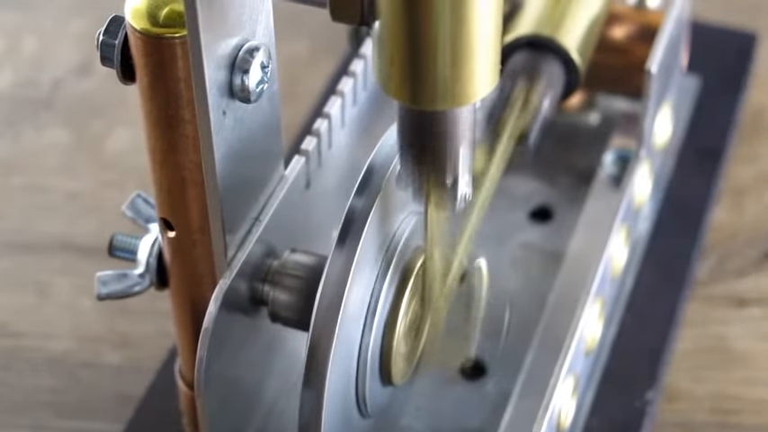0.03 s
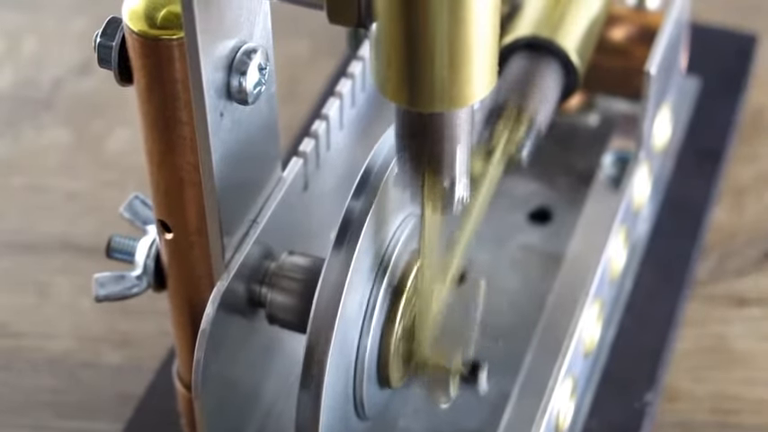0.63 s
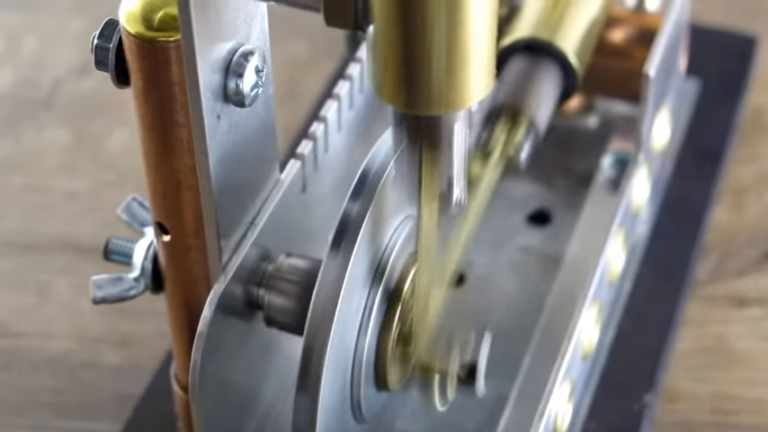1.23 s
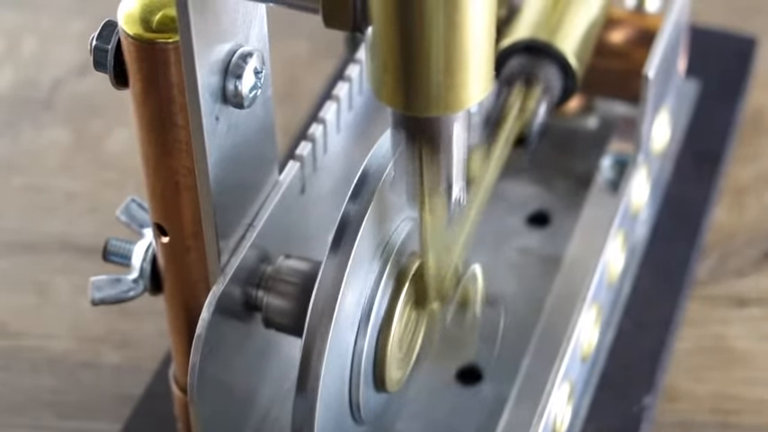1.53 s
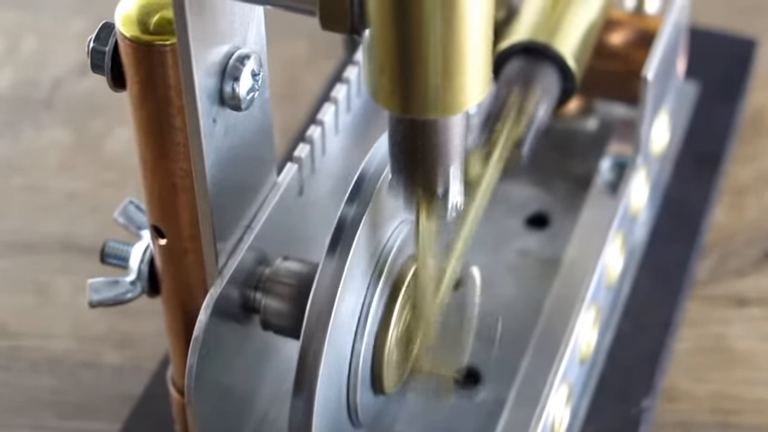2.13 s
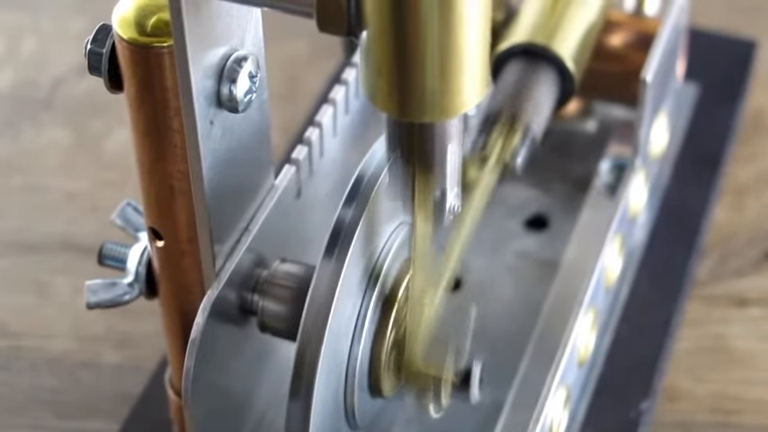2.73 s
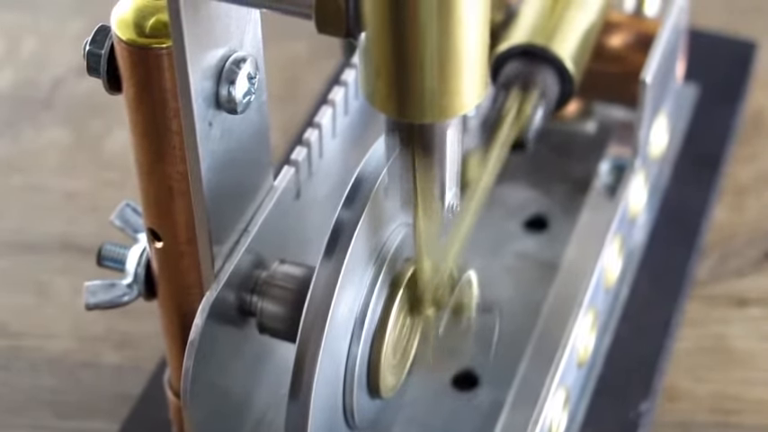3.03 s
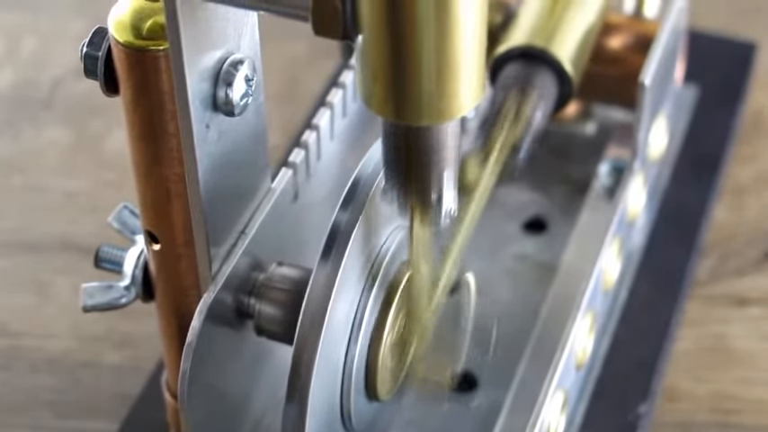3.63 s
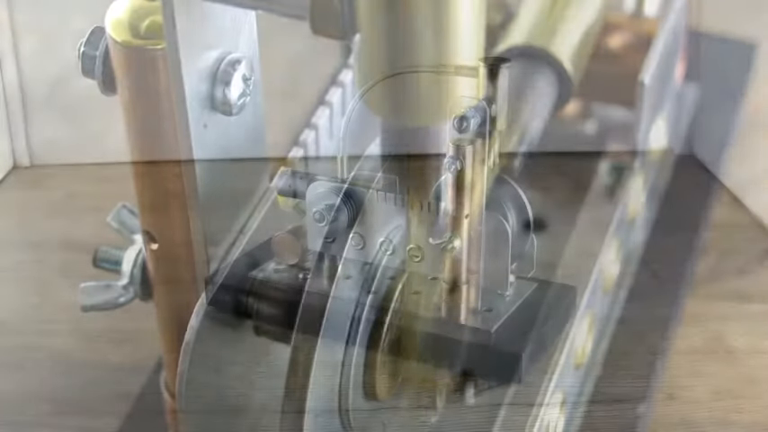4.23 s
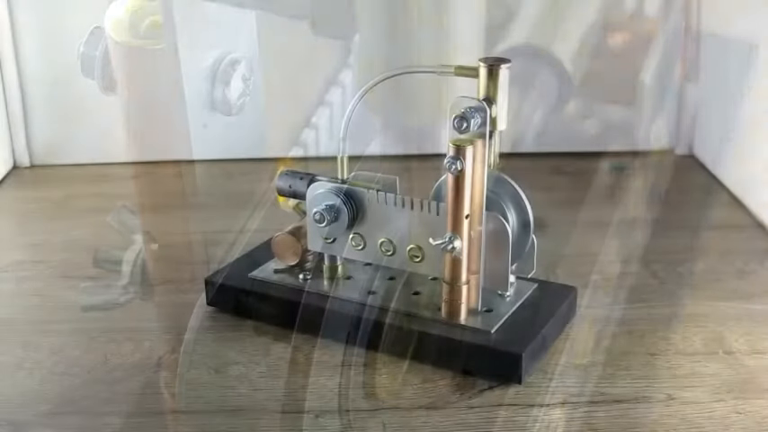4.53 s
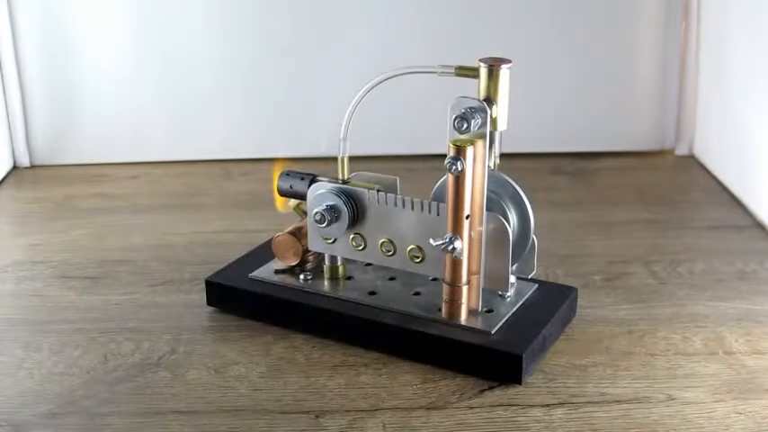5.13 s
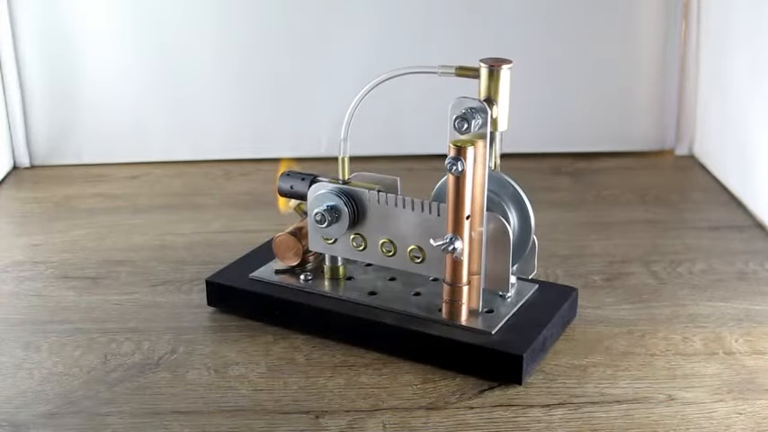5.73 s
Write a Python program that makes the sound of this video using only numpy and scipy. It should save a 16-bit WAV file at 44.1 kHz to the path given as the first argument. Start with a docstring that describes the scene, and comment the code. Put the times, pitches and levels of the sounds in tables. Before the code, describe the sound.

Rapid, steady metallic knocking and whirring from a little engine close by, then, after a short silence, from a step away.

```python
"""A small hot air engine runs at about 25 turns a second on a wooden table, heard first from close by.
Three times a turn the play in its linkage knocks against the metal frame; the hardest knocks make a
rod ring, and the swinging masses make the base hum. It pushes harder for two seconds, then eases.
At 4.7 s a short silence falls, and then the engine is heard from a step away, its knocks softer."""
import sys
import numpy as np
from scipy.fft import rfft, irfft, next_fast_len
from scipy.io import wavfile
from scipy.ndimage import uniform_filter1d

SR = 44100
rng = np.random.default_rng(int(sys.argv[2]) if len(sys.argv) > 2 else 0)


def master(y):
    """Save y as 16-bit WAV."""
    cut = np.clip(np.atleast_2d(y).T, -1, 1)
    pcm = np.round(cut * 32767)  # scale
    wavfile.write(sys.argv[1], SR, pcm.astype(np.int16))


N = 260190


def engine_close():
    """Right above the crank the knocks are sharp and the rod rings loudly."""
    # crank position: (time [s], turns completed)
    crank = [(-.0437, -2), (2.0059, 50), (4.7273, 119)]
    # how hard the engine pushes: (time [s], effort [dB])
    effort = [(0, -1.8), (1.2, 0.1), (1.72, 0), (2.13, 2), (2.26, -3), (2.85, 0), (3.05, -2.5), (3.3, -1.8),
              (4.67, -1.3)]
    # the knocks of one turn, levels relative: (crank angle [turns], level [dB], base rise [s],
    # base t60 [s], first contact [dB], scrape before it [dB], rod ring [dB], scatter [dB])
    knocks = [(0, 1.5, 0.0014, 0.054, -2.5, -16, 0, 0.8), (.385, -7, 0.0023, 0.099, -2, 2, -6.6, 3),
              (0.701, -9, 0.00024, 0.057, 0, -40.5, -37.5, 1)]
    # overall colour of the knocks: (frequency [Hz], relative level [dB])
    slope = [(30, -17), (80, -17), (300, -11), (500, -15.5), (1100, -15), (1500, -9.5), (3300, -16),
             (5500, -0.5), (8200, -1.5), (9100, -12.5), (11500, -18.5), (12900, -24.5), (15400, -28.5)]
    # resonances of the metal frame: (frequency [Hz], width [Hz], boost [dB])
    modes = [(767, 510, 6), (1527, 343, 10.5), (1950, 184, 11), (2512, 367, 14), (2842, 223, 15),
             (3164, 146, 10.5), (3554, 183, 10), (3905, 610, 11.5), (4663, 310, 13.5), (5360, 490, 5),
             (5845, 400, 5.5), (6810, 270, 7), (7230, 320, 5), (10520, 160, 5.5)]
    # hum of base and frame: (multiple of crank speed, relative level [dB])
    orders = [(1, -48), (2, -62.5), (3, -61), (4, -55.6), (5, -52.5), (6, -50.5), (7, -48.5), (8, -55.5),
              (9, -62.5), (10, -51), (11, -61), (12, -44), (13, -65.5), (14, -59.5), (15, -54), (16, -60.5),
              (25, -65.5), (28, -52.5), (32, -60), (33, -58), (35, -56.5), (38, -60), (43, -56.5),
              (55, -52), (61, -51), (62, -42), (66, -46), (69, -46), (78, -53.5), (80, -44.5)]
    # stereo balance: (frequency [Hz], left minus right [dB])
    balance = [(60, -1.5), (99, 1.5), (160, -2.5), (270, -0.5), (450, -3), (740, -0.5), (1220, 1.0),
               (2010, -0.5), (3330, 0.0), (5500, -0.5), (9080, -16), (15000, -2.5)]
    blows = strikes(crank, effort, knocks)
    shake = shaking(blows, quick=1, scrape_db=-10, jitter_s=.00015)
    knocking = clatter(blows, shake, slope, modes, grain=0.19, linger=1.395, quick=1.7,
                       rub=0.47, drift=0.52)
    ringing = rod(blows, ring_hz=4489, detune=0.0048, rise_s=0.0011, free_s=0.012, phase_spread=0.52)
    humming = hum(crank, orders, shake, waver=0.5, pulsing=1.0)
    return microphones(amp(-24) * knocking + amp(-13) * ringing + amp(0.27) * humming, balance)


def engine_wide():
    """From a step away the knocks are softer and the table's hum stands out."""
    # columns and units as in engine_close
    crank = [(4.7662, -2), (5.9521, 28)]  # crank position
    effort = [(4.84, -0.7), (5.9, 0.61)]  # how hard the engine pushes
    knocks = [(-.003, 3.5, 0.0013, 0.05, -3.5, -9, -0.5, 0.76),
              (0.389, -3.5, 0.0017, 0.08, -5, -0.5, -8, 1.1),
              (0.701, -2.5, 0.00045, .046, -3, -16, -22, 1.1)]  # the knocks of one turn
    slope = [(30, -9), (80, -13), (300, -10), (500, -10.5), (1100, -11), (1500, -9), (3300, -12),
             (5500, -1.5), (8200, -2), (9100, -16.5), (11500, -21.0), (12900, -26), (15400, -34)]  # their overall colour
    modes = [(1604, 320, 8.9), (2010, 200, 8.5), (2570, 210, 8.3), (2795, 130, 9.6), (3140, 140, 5.2),
             (3586, 250, 11.3), (3960, 320, 10), (4590, 700, 10.1), (5380, 150, 9.4), (5660, 380, 4.4),
             (6660, 170, 6.9), (7200, 120, 3), (10300, 160, 3.7)]  # frame resonances
    orders = [(1, -53.5), (2, -56.5), (3, -70.5), (4, -66), (5, -52.5), (6, -54.5), (7, -43), (8, -55),
              (9, -54), (10, -50.5), (11, -77), (12, -43.5), (13, -81), (14, -62), (15, -66), (16, -60),
              (20, -60), (28, -61), (33, -81), (34, -59.5), (59, -45.5), (61, -44.5), (62, -43), (67, -55),
              (78, -52), (81, -46)]  # hum of base and frame
    balance = [(60, 0), (110, -0.5), (200, -2), (380, -0.5), (700, -0.5), (1290, -0.5), (2380, -1),
               (4400, 2), (8120, -12.5), (15000, -4)]  # stereo balance
    blows = strikes(crank, effort, knocks)
    shake = shaking(blows, quick=0.97, scrape_db=-0.5, jitter_s=0.00019)
    knocking = clatter(blows, shake, slope, modes, grain=0.27, linger=1.43, quick=1.2,
                       rub=0.72, drift=0.17)
    ringing = rod(blows, ring_hz=4406, detune=0.0042, rise_s=0.0013, free_s=0.012, phase_spread=0.62)
    humming = hum(crank, orders, shake, waver=-0.9, pulsing=1.16)
    return microphones(amp(-27.5) * knocking + amp(-23.5) * ringing + amp(-0.54) * humming, balance)


def strikes(crank, effort, knocks):
    """The linkage knocks at set crank angles; strength follows effort and surges by chance."""
    surge_depth_db, surge_turns = 0.8, 2.7
    effort_response = (1, 1.9, 1)  # dB per dB: the loose return stroke reacts most
    seconds, turns = np.transpose(crank)
    whole = np.arange(turns[0], turns[-1])
    count = np.arange(len(whole))
    surge_db = surge_depth_db * np.interp(count / surge_turns, count, rng.standard_normal(len(whole)))
    blows = []
    for (angle, *knock, scatter_db), response in zip(knocks, effort_response):
        times = np.interp(whole + angle, turns, seconds)
        stroke_db = response * (curve(effort, times) + surge_db)
        sizes = amp(stroke_db + scatter_db * rng.standard_normal(len(times)))
        blows.append((times, sizes, knock))
    return blows


def shaking(blows, quick, scrape_db, jitter_s):
    """Envelope of all knocks: the joint slides, makes first contact, then chatters and settles."""
    lead = SR // 150
    t = np.arange(-lead, SR // 12) / SR
    after = np.maximum(t, 0)
    power = np.zeros(N)
    for times, sizes, (db, rise, t60, contact_db, slide_db, _) in blows:
        slide = amp(slide_db + scrape_db) * np.exp(-(t / 0.0031) ** 2)
        contact = amp(contact_db) * (1 - np.exp(-after / .0009)) * np.exp(-after / 0.0028)
        settle = (1 - np.exp(-after * quick / rise)) * amp(-60 * after * quick / t60)
        shape = np.sqrt(slide ** 2 + contact ** 2 + settle ** 2)
        starts = times - lead / SR + jitter_s * rng.standard_normal(len(times))
        power += place(starts, (amp(db) * sizes[:, None] ** 0.48 * shape) ** 2)
    return np.sqrt(power / np.mean(power[power > 0]))


def clatter(blows, shake, slope, modes, grain, linger, quick, rub, drift):
    """Each knock sounds through the frame: a body that repeats and a chatter that never does."""
    # part of a knock that is alike on every turn: (frequency [Hz], power share [0-1])
    repeat = [(100, 0.2), (380, 0.1), (500, 0.78), (1500, 0.35), (2800, 0.26), (4500, 0.26), (6500, 0),
              (10000, 0.07)]
    # likeness of the chatter left and right: (frequency [Hz], correlation [0-1])
    alike = [(200, 0.93), (1400, 0.76), (3100, 0.62), (5000, 0.25), (7000, 0.48), (14000, 0.43)]
    share = lambda hz: along(repeat, hz)
    spread = lambda hz: np.arccos(along(alike, hz)) / 2
    mid_side = lambda hz: np.array([np.cos(spread(hz)), np.sin(spread(hz))])
    active_rms = np.sqrt(np.mean(shake > 0))
    body = active_rms * knock_body(blows, linger, drift)
    rubbing = active_rms * unit(shake ** rub)
    ticks = shaking(blows, quick, scrape_db=-3.5, jitter_s=.00015)
    grit = chatter(rubbing, shake, ticks, grain)
    mid, side = filtered(grit, lambda hz: np.sqrt(1 - share(hz)) * mid_side(hz))
    mid = mid + filtered(body, lambda hz: np.sqrt(share(hz)))
    return filtered(np.array([mid + side, mid - side]), lambda hz: frame(slope, modes, hz))


def knock_body(blows, linger, drift):
    """The low, repeating part of a knock builds up slowly and rings longer in the frame."""
    t = np.arange(SR // 12) / SR
    body = np.zeros(N)
    for times, sizes, (db, rise, t60, *_) in blows:
        shape = amp(db - 60 * t / (t60 * linger)) * (1 - np.exp(-t / (rise + 0.00084)))
        # the point of contact wanders over a second or so, and the overtones with it
        wander = drift * smooth_noise(len(times), span=24)[:, None]
        train = np.cos(wander) * echoes(shape) + np.sin(wander) * echoes(shape)
        body += place(times, sizes[:, None] ** 0.5 * train)
    return unit(body)


def chatter(rubbing, shake, ticks, grain):
    """Tiny contacts make grit: rubbing joints in the mids, knocks in the treble, brief ticks on top."""
    contacts = np.exp(grain * smooth_noise(N, span=40))

    def grit(envelope, band):
        noise = envelope * contacts * rng.standard_normal((2, N))
        return filtered(noise, lambda hz: np.sqrt(band(hz)))

    above = lambda hz, edge_hz: 1 / (1 + (edge_hz / (hz + 1)) ** 8)
    mids = lambda hz: 1 - above(hz, 3530)
    top = lambda hz: above(hz, 7800)
    treble = lambda hz: (1 - mids(hz)) * (1 - top(hz))
    return grit(rubbing, mids) + grit(shake, treble) + grit(ticks, top)


def echoes(shape):
    """A colourless train of dense reflections that dies away along shape."""
    train = shape * rng.standard_normal(len(shape))
    for _ in range(4):  # flatten the spectrum and restore the envelope in turn
        train = irfft(np.exp(1j * np.angle(rfft(train))), len(shape))
        train *= shape / np.sqrt(np.abs(uniform_filter1d(train ** 2, size=128)) + 1e-12)
    return train


def frame(slope, modes, hz):
    """The metal frame's response, of mean power 1: resonances on a broad slope."""
    peaks_db = sum(db / (1 + (2 * (hz - centre) / width) ** 2) for centre, width, db in modes)
    return causal(unit(amp(along(slope, hz) + peaks_db)))


def rod(blows, ring_hz, detune, rise_s, free_s, phase_spread):
    """A struck rod rings for a few milliseconds, until the bearing takes up its play and damps it."""
    t = np.arange(SR // 50) / SR
    out = np.zeros(N)
    for times, sizes, (*_, ring_db) in blows:
        pitch, length, phase = rng.standard_normal((len(times), 3)).T[:, :, None]
        damped_at = free_s * np.exp(length / 6)
        shape = (1 - np.exp(-t / rise_s)) * np.exp(-(t / damped_at) ** 4 - t / .012)
        tone = np.sin(2 * np.pi * ring_hz * (1 + detune * pitch) * t + phase_spread * phase)
        out += place(times, amp(ring_db) * sizes[:, None] ** 0.79 * shape * tone)
    return out


def hum(crank, orders, shake, waver, pulsing):
    """The swinging masses shake base and frame at whole multiples of the crank speed."""
    t = np.arange(N) / SR
    angle = 2 * np.pi * curve(crank, t)
    knots = np.arange(0, N / SR + 1, 1 / 10)
    # tones above the 50th order belong to the frame and swell with every knock
    swell = np.abs(uniform_filter1d(shake, size=128)) ** pulsing
    out = np.zeros(N)
    for order, db in orders:
        waver_db = waver * np.sqrt(order / 10) * rng.standard_normal(len(knots))
        level = np.interp(t, knots, amp(db + waver_db))
        tone = np.sqrt(2) * level * np.sin(order * angle + 2 * np.pi * rng.random())
        out += tone * swell if order > 50 else tone
    return out


def microphones(x, balance):
    """The engine stands to the right: the left side gets less top end, and gets it later."""
    # phase between the sides: (frequency [Hz], lead of the left [rad])
    left_lead = [(100, 0), (1500, -.1), (3400, -0.1), (4100, -1.6), (4500, -0.51), (5600, -1.42),
                 (6500, -2.04), (8500, -1.17), (14000, -0.48)]

    def pair(hz):
        ratio = amp(along(balance, hz))
        lead = np.exp(.5j * along(left_lead, hz))
        return np.array([ratio * lead, 1 / lead]) * np.sqrt(2 / (1 + ratio ** 2))
    return filtered(x, pair)


def amp(db):
    """Decibels to gain."""
    return 10 ** (np.asarray(db) / 20)


def unit(x):
    """x at rms 1."""
    return x / np.sqrt(np.mean(x ** 2) + 1e-20)


def smooth_noise(count, span):
    """Noise averaged over span values, at rms 1."""
    return unit(uniform_filter1d(rng.standard_normal(count), size=span))


def along(points, hz):
    """(Hz, value) points read on a log axis."""
    freqs, values = np.transpose(points)
    return np.interp(np.log(hz + 1), np.log(freqs + 1), values)


def curve(points, times):
    """(s, value) points read at the given times."""
    return np.interp(times, *np.transpose(points))


def filtered(x, response):
    """x through a complex response of frequency."""
    size = 2 * next_fast_len(N // 2 + SR // 8)
    return irfft(rfft(x, size) * response(np.fft.rfftfreq(size, 1 / SR)), size)[..., :N]


def causal(gain):
    """The response with this gain that rings only after a blow."""
    cepstrum = irfft(np.log(np.maximum(gain, 1e-6)))
    cepstrum[1:len(cepstrum) // 2] *= 2
    cepstrum[len(cepstrum) // 2 + 1:] = 0
    return np.exp(rfft(cepstrum))


def place(times, sounds):
    """The sum of short sounds (rows), each starting at its time."""
    at = np.round(times * SR).astype(int)[:, None] + np.arange(sounds.shape[1])
    inside = (at >= 0) & (at < N)
    return np.bincount(at[inside], sounds[inside], N)


def scene():
    """The close position, a short silence, then the farther one."""
    # a fader for each position: (time [s], gain [0-1])
    close_fader = [(0, 1), (4.672, 1), (4.677, .15), (4.69, 0)]
    wide_fader = [(4.839, 0), (4.845, 1)]
    t = np.arange(N) / SR
    return curve(close_fader, t) * engine_close() + curve(wide_fader, t) * engine_wide()


def record(dry):
    """A steep low-pass takes off the very top."""
    top_hz = 15750
    return filtered(dry, lambda hz: 1 / np.sqrt(1 + (hz / top_hz) ** 160))


dry = scene()
out = record(dry)
master(out)
```